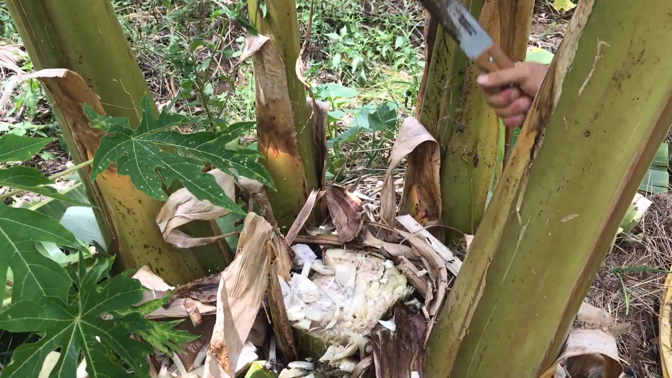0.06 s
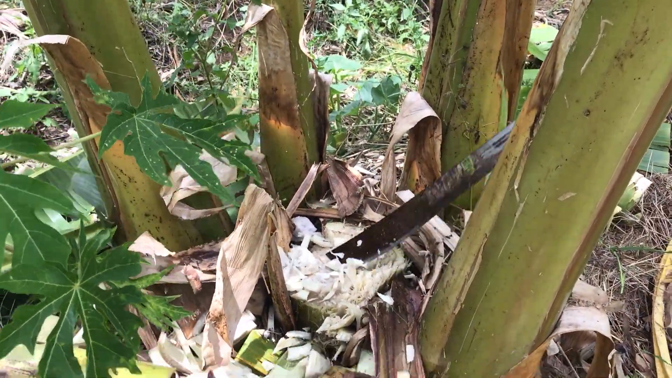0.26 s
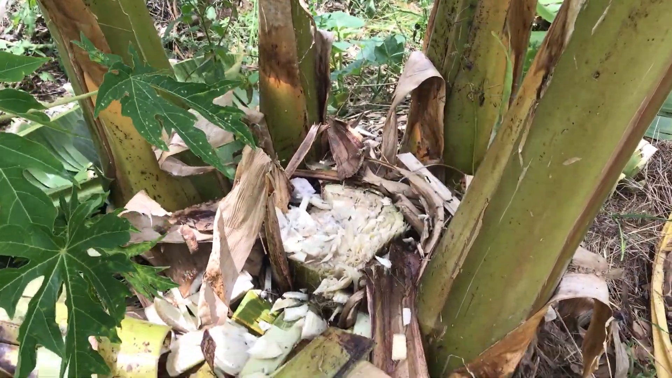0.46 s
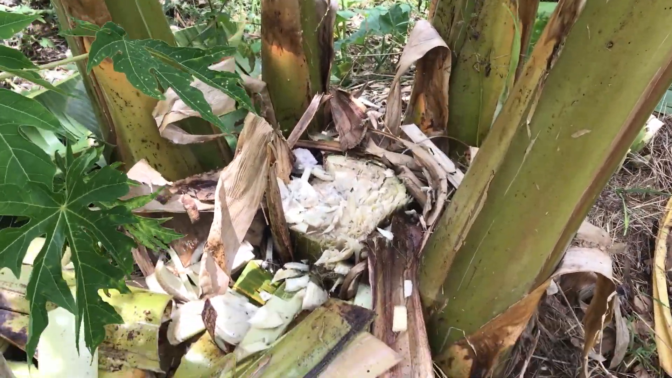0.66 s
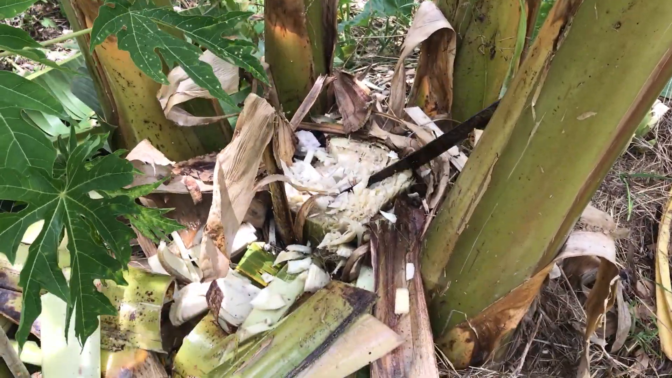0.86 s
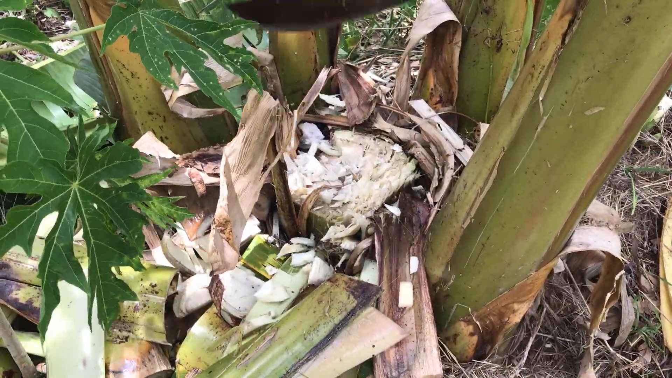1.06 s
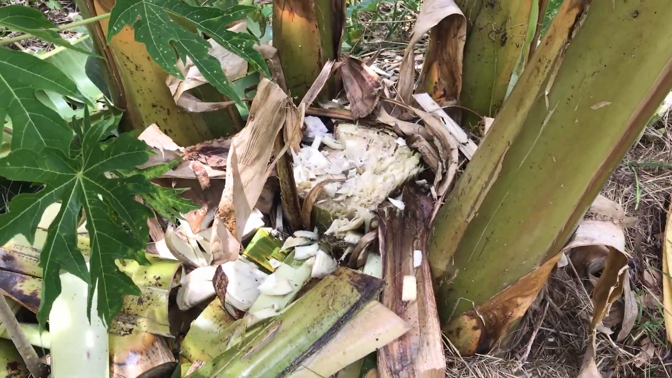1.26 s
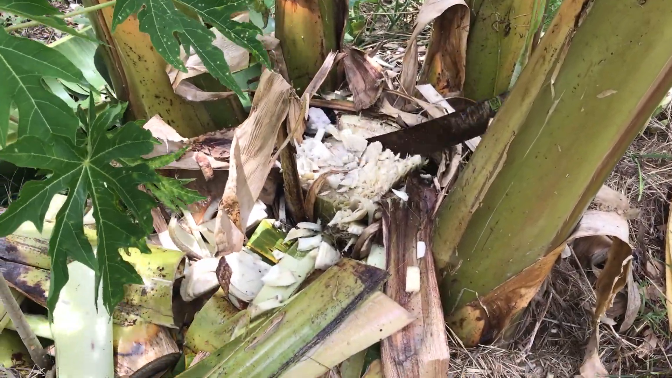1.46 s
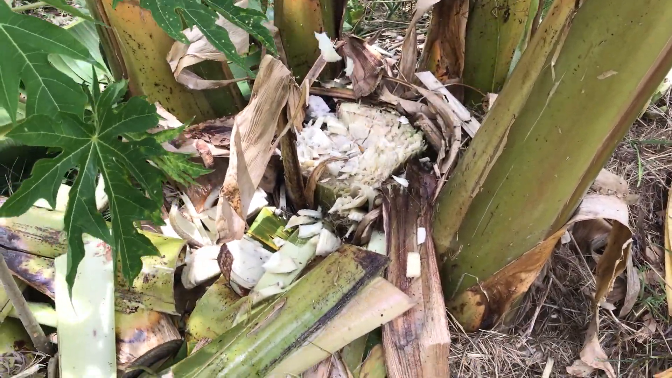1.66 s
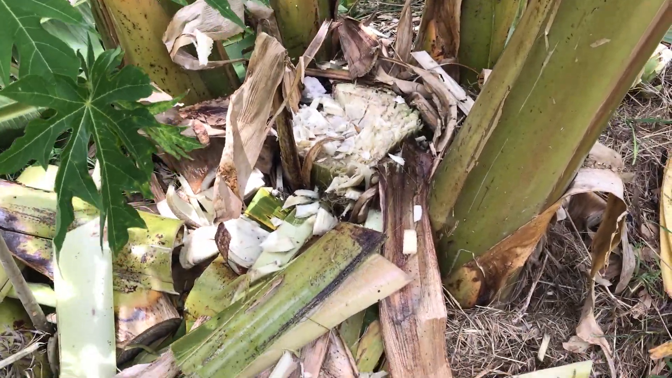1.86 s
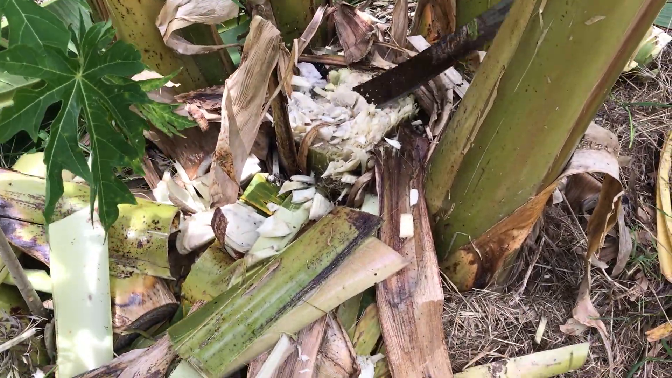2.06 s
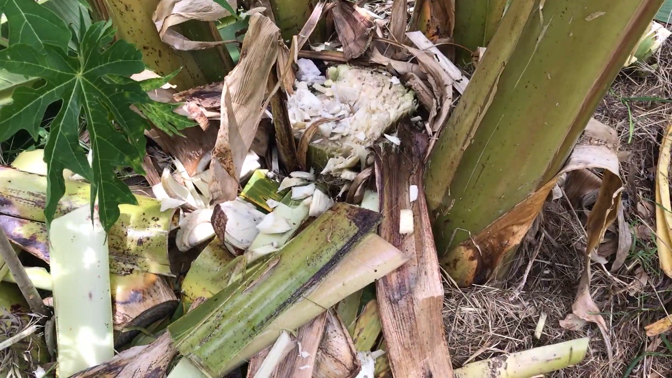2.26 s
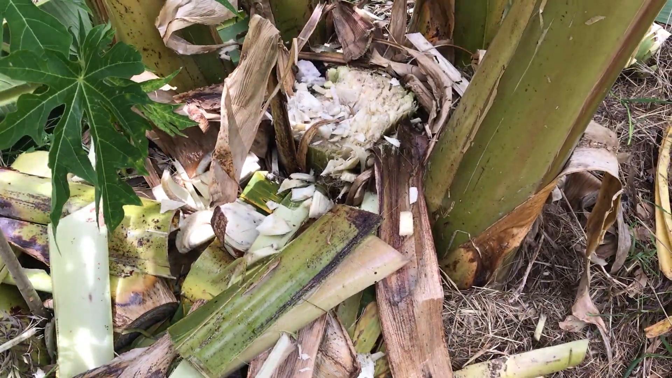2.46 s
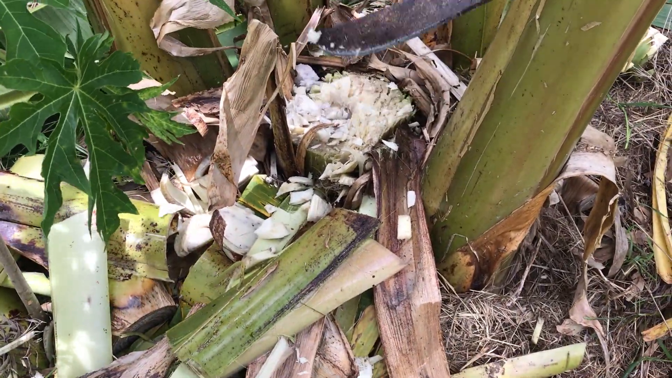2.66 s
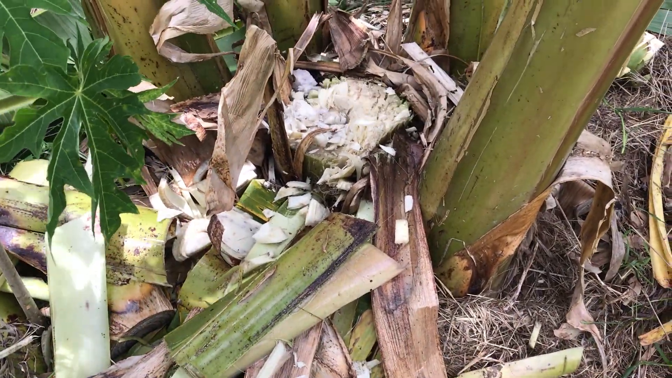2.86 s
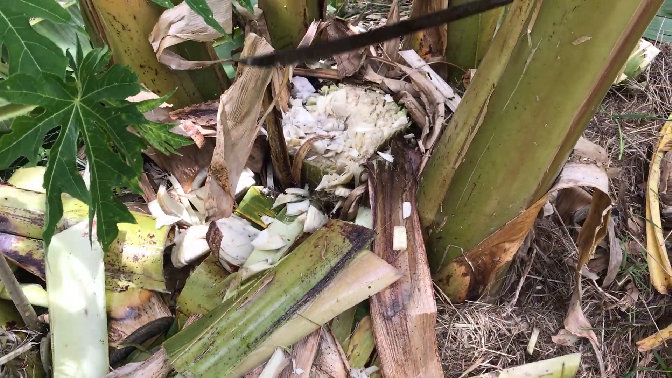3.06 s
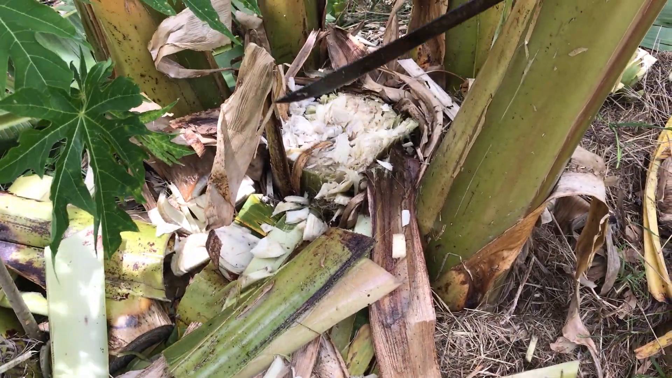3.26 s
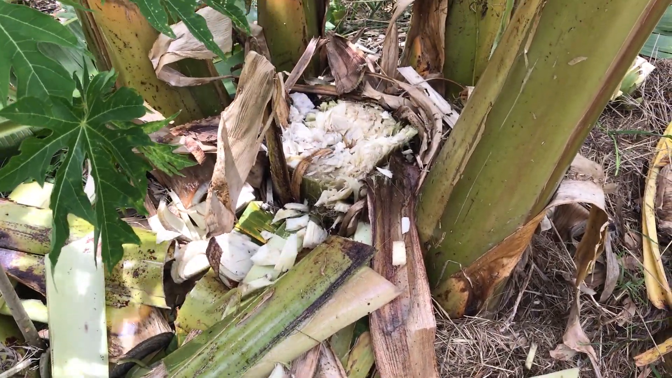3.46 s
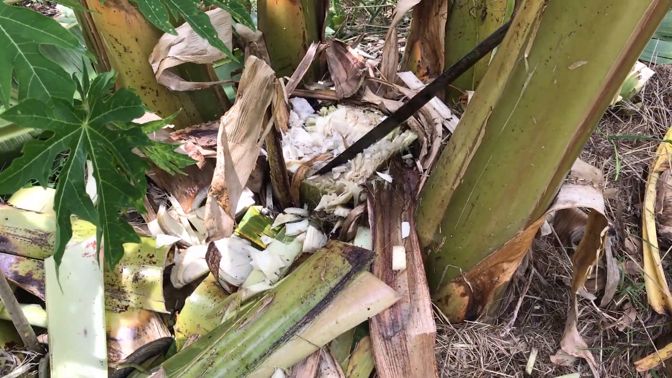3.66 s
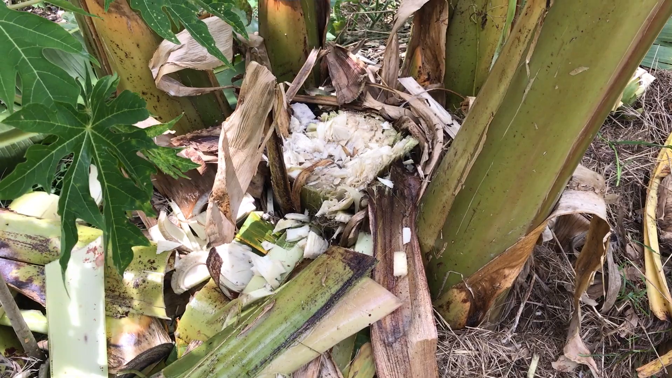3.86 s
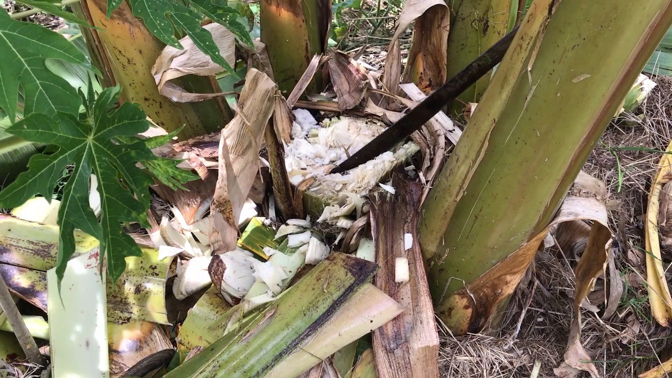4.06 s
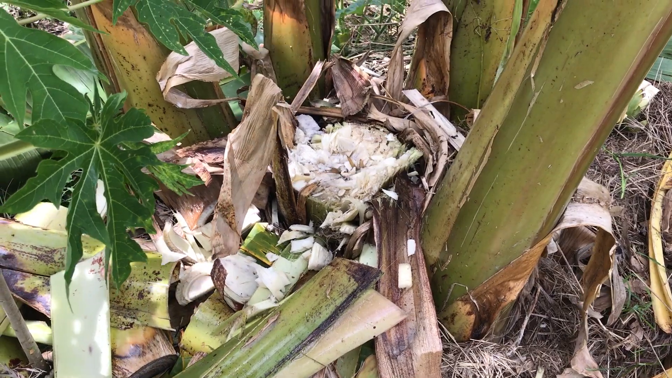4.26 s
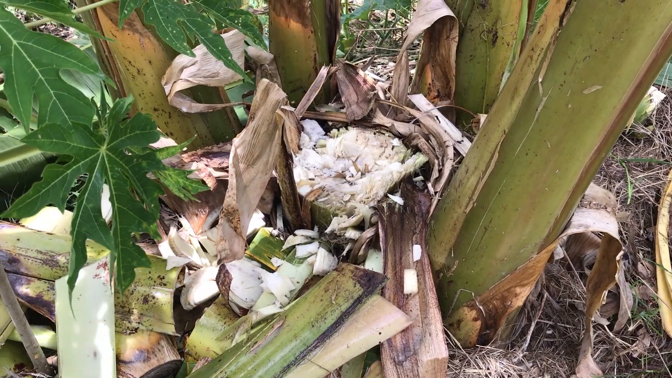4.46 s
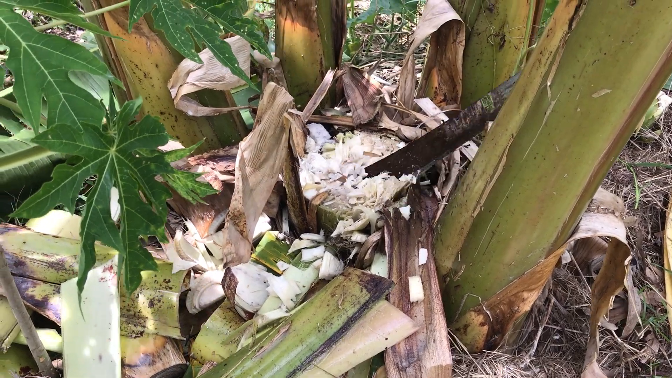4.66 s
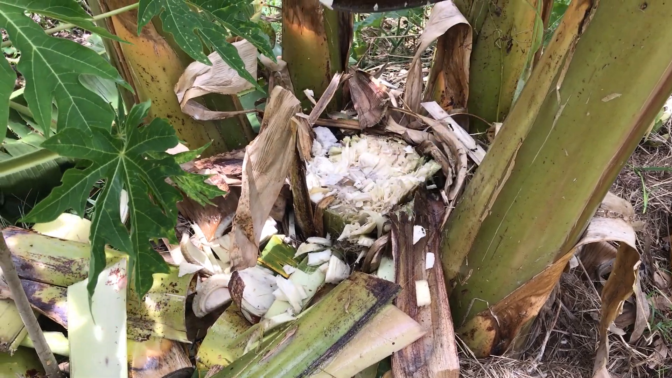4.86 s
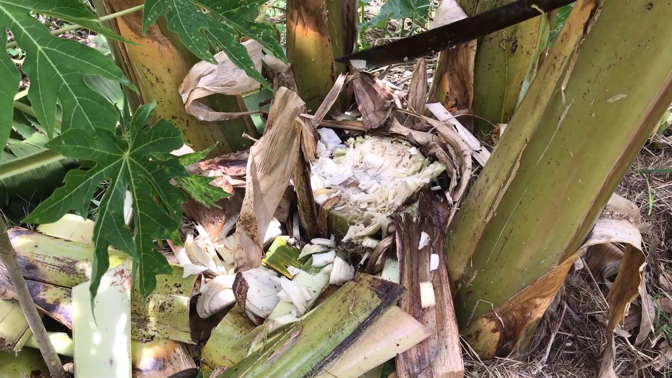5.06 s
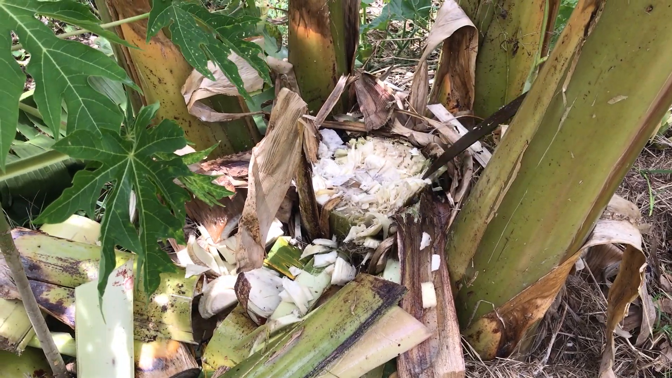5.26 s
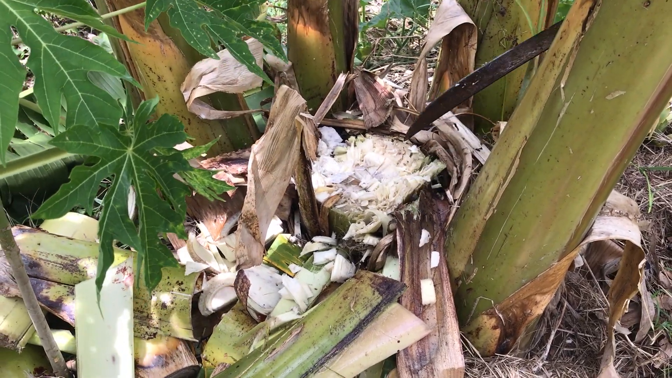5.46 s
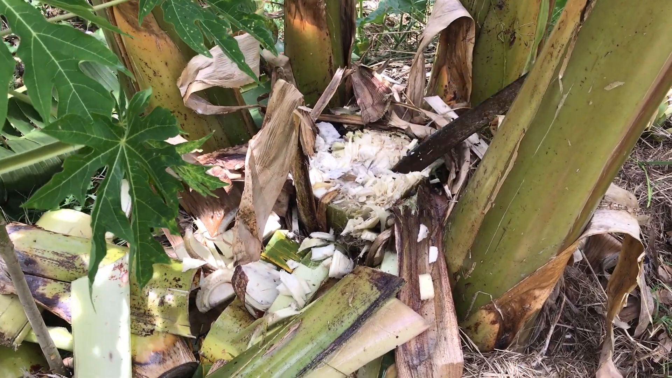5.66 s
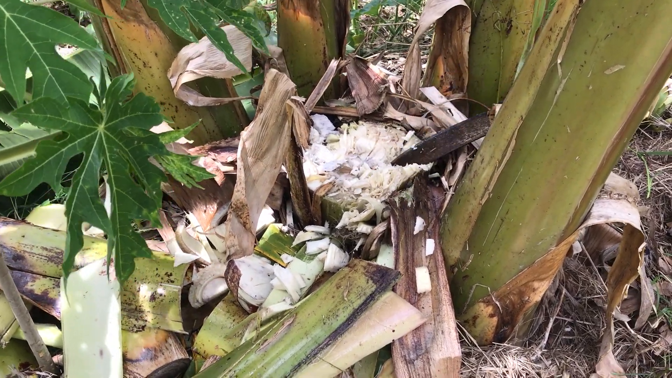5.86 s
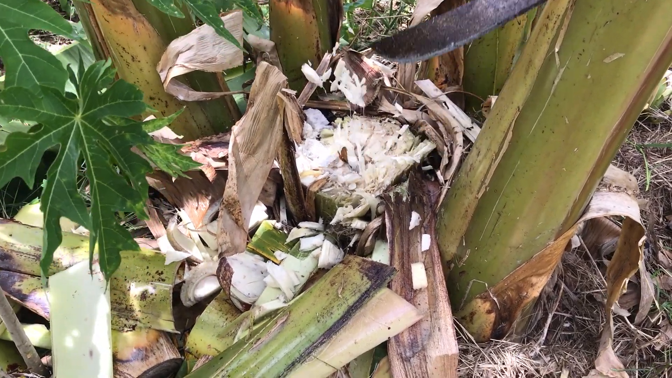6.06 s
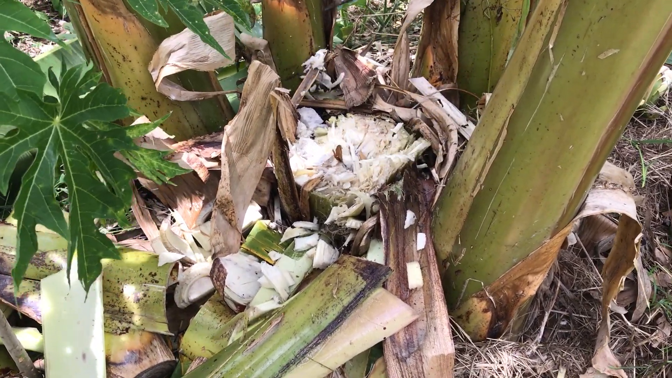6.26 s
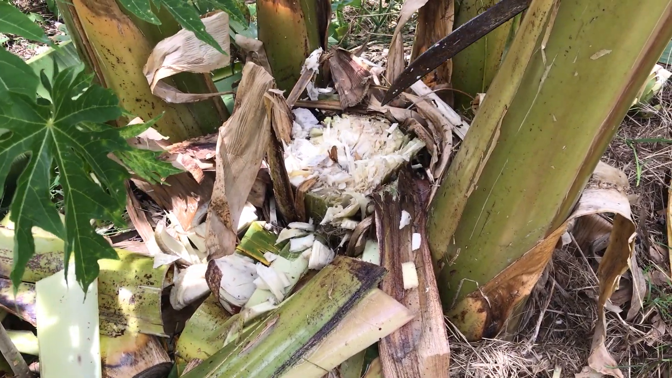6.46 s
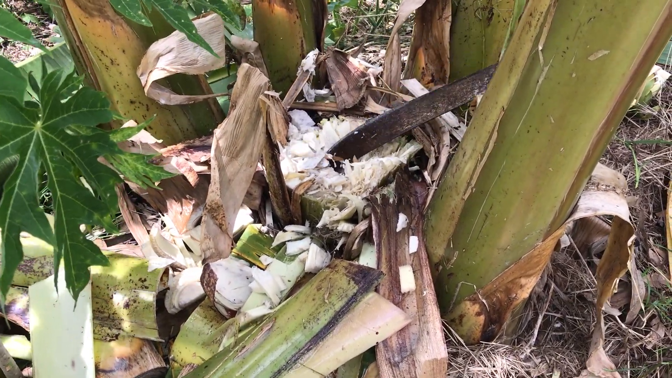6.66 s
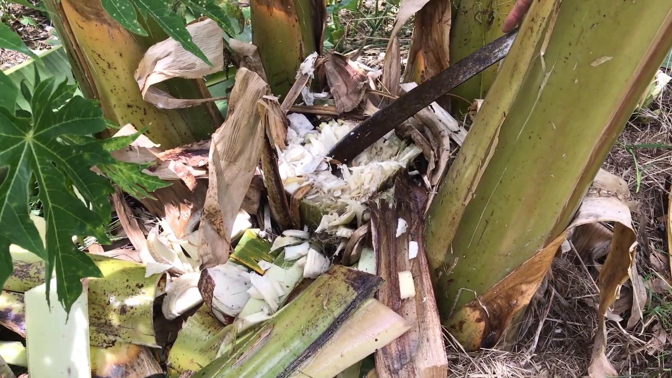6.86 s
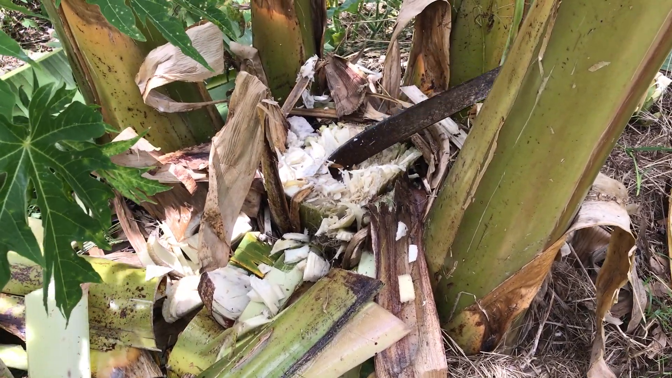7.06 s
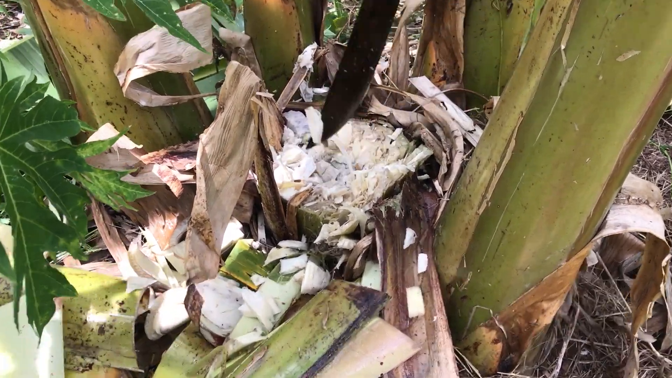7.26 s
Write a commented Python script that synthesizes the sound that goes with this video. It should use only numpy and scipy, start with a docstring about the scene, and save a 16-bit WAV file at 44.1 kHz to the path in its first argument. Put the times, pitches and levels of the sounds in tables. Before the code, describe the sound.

A long blade chops again and again into a wet, fibrous plant stump outdoors, with crunching snaps, dull knocks and light wind bumping the microphone.

```python
"""Outdoors, one microphone: light wind buffets its port over a far rustle of leaves, all shaped noise and swells.
From the first moments a long blade chops a wet, fibrous stump: dense snaps through resonances, with knocks
and low thuds from ringing modes. Lighter contacts drag, snap and settle; now and then the steel rings faintly.
Near the middle a distant engine, a tone with a weak partial, fades in; later a faint squeak falls in pitch,
the blade stirs and scrapes the pulp, the engine goes, and a few last chops follow."""
import sys
import numpy as np
from scipy import signal
from scipy.io import wavfile

SR = 44100
rng = np.random.default_rng(int(sys.argv[2]) if len(sys.argv) > 2 else 0)


def put_to_file(sound):
    """Save the sound as 16-bit audio at rate SR, in the file named by the first command-line argument."""
    columns = np.atleast_2d(sound).T  # one column per channel
    safe = np.clip(columns, -1, 1)
    whole_steps = np.round(safe * 32767)
    wavfile.write(sys.argv[1], SR, whole_steps.astype(np.int16))


N = 322371

# All levels are ahead of the microphone's own colour.
# Distant engine, heard from the first row to the last: [t/s, firing f/Hz, mean level/dB]
ENGINE = [(3.75, 53.7, -85), (3.85, 54, -55), (4.01, 63.2, -61), (4.63, 67.8, -58), (5.07, 64.5, -63),
          (5.21, 73.7, -65.5), (5.449, 74.5, -58), (5.75, 85, -62.5)]
# Spectrum of the far leaves: [f/Hz, relative level of the noise density/dB]
LEAF_SPECTRUM = [(88, -31), (150, -3), (488, -6), (898, -8.5), (1250, -7.5), (2010, -10.5), (4000, -12.5),
                 (6170, -15.5), (7660, -17.5), (8620, -17.5), (10300, -17.5), (12500, -21.5), (15600, -19),
                 (16500, -49.5)]
# Loudness of the far leaves: [t/s, level/dB]
LEAF_LEVEL = [(0, -57), (.4, -60), (.96, -58.5), (1.77, -59.5), (5.37, -62), (6.0, -58.5), (6.96, -61.5),
              (7.31, -58.5)]
# Wind at the microphone port: [t/s, rumble level/dB, flutter level/dB]
WIND = [(0.0, -41, -43), (0.14, -56, -67), (0.32, -52, -48), (0.63, -57, -63), (1.22, -60.5, -55.5),
        (1.4, -55, -52.5), (1.55, -56.5, -59), (1.73, -65, -72), (1.89, -65, -63), (2.46, -60, -65),
        (2.54, -61.5, -61.5), (2.87, -64.5, -66), (3.03, -57.5, -56), (3.24, -58, -60.5),
        (3.34, -58.5, -71), (3.68, -65.5, -63.5), (4.27, -60, -75), (4.48, -57, -75), (5.21, -60, -70),
        (5.39, -62.5, -70), (6.19, -60, -62.5), (6.33, -63.5, -63.5), (6.88, -63, -69.5),
        (7.31, -71, -67.5)]
# Gusts thump the microphone port: [t/s, peak level/dB, base pitch f/Hz, which the sweep multiplies]
BUFFETS = [(.03, -46, 153), (0.218, -33.5, 70), (0.28, -53, 69), (.329, -36, 53.8), (0.37, -37, 68),
           (0.416, -37, 55), (.455, -43.5, 70), (0.62, -46, 146), (0.681, -42.5, 78), (.859, -46, 179),
           (0.92, -32.5, 95), (1.158, -45.5, 143), (1.213, -37, 62), (1.27, -38, 74), (1.306, -37.5, 138),
           (1.507, -44, 129), (1.559, -49, 67), (1.649, -47, 76.5), (2.278, -44, 48.4), (2.798, -47, 135),
           (3.051, -44, 138), (3.377, -39.5, 61), (3.448, -46.5, 254), (4.447, -52, 70.6),
           (4.941, -45.5, 149.4), (5.821, -36, 64), (6.117, -48.5, 114), (6.334, -38.5, 147),
           (6.654, -42.5, 60.5), (6.854, -44.5, 59.2), (7.084, -46.5, 49)]
# Wet steel on a sheath: [t/s, length/s, from f/Hz, to f/Hz, peak level/dB]
SQUEAK = (5.315, .035, 2680, 2420, -62)
# Steel modes of the blade: [f/Hz, relative level/dB, t60/s]
BLADE_MODES = [(4371, 0, .4), (5033, -6, .45), (5647, -8, .33), (6170, -3, .28), (6681, -6, .2),
               (7978, -14, .15), (11440, -12, .17), (12440, -10, .15), (13420, -12, .2), (14365, -10, .15),
               (15220, -12, .3)]
# The steel is set ringing: [t/s, rub length/s, drive level/dB, favoured f/Hz, spread f/Hz]
RUBS = [(.19, .095, -49.5, 5650, 300), (2.112, .01, -49, 6680, 300), (5.286, 0.059, -59, 6170, 300),
        (5.385, .03, -39, 14200, 1300), (5.41, 0.018, -47.5, 5770, 300), (5.44, .17, -45, 15200, 500),
        (5.995, .01, -38, 12840, 2000), (5.994, 0.034, -43, 4800, 750), (6.003, .01, -42, 6350, 520),
        (6.41, 0.15, -41.5, 15200, 590), (6.501, .09, -54, 6170, 297)]
# Single fibres and bits of leaf snap: [t/s, peak level/dB, centre f/Hz, width as share of centre]
SNAPS = [(.732, -46, 10000, 1), (0.966, -35, 6200, 0.16), (.9856, -38, 11400, 0.8),
         (1.207, -47.5, 4040, 0.66), (1.496, -42, 1320, 0.61), (1.9526, -33.5, 1860, 0.59),
         (2.052, -32.5, 2390, .6), (2.103, -33.5, 9250, .92), (2.311, -40, 1040, 1.2),
         (2.474, -45, 1100, .5), (3.158, -45, 2810, 1), (3.191, -39, 2000, 0.98), (3.28, -48, 1000, .8),
         (3.4562, -39.5, 705, 0.87), (4.0906, -46, 8660, 1.3), (4.274, -48, 1600, 0.52),
         (5.094, -48.5, 3080, 1.2), (5.533, -40.5, 1335, 0.73), (5.602, -42, 4480, .6),
         (5.7901, -42, 1168, 0.2), (5.807, -47, 1200, 0.46), (5.967, -38, 2800, .5),
         (6.1394, -48.5, 785, 0.66), (6.1567, -44.5, 10000, 1.16), (6.204, -44, 1700, 0.51),
         (6.227, -43, 2000, .6), (6.25, -36, 1500, 0.71), (6.282, -39.5, 1080, 0.44),
         (6.582, -37, 2600, 0.16), (6.628, -24.5, 4140, 0.21), (6.644, -26, 4200, 0.28),
         (6.8352, -40, 8396, 0.36), (6.899, -48.5, 3000, 1.4), (7.219, -39, 1050, 0.59),
         (7.227, -41, 1100, .5)]
# Modes of the upper stump: [f/Hz, level over the thud/dB, t60/s]
FLEX_MODES = [(168, 8.5, 0.0479), (240, 14, 0.036), (275, 8, .035), (460, 6, .03)]
# Modes of the cut face: [f/Hz, relative level/dB, t60/s]
GASH_MODES = [(635, -6, .02), (860, -11.5, .014), (1116, -5.5, 0.011), (1500, -10.5, 0.019),
              (1852, -7.5, 0.023), (2100, -4, .017)]
# Resonances of the wet stump: [f/Hz, width f/Hz, relative level/dB]
PULP = [(306, 200, -7), (597.8, 83, 0.5), (1040, 540, -1.5)]
# Resonances of stiff fibres: [f/Hz, width f/Hz, relative level/dB]
CRUNCH = [(1949, 1700, 3), (3500, 3700, 2)]
# Resonances of thin fibres and sap: [f/Hz, width f/Hz, relative level/dB]
SIZZLE = [(6360, 1400, 1), (8670, 2300, -1.5), (13800, 9200, -1.5)]
# Lighter contacts: the blade drags through pulp and leaves, fibres snap, and torn layers settle after a chop:
# [t/s, rise/s, crunch level/dB, pulp over crunch/dB, sizzle over crunch/dB, t60/s]
LIGHT_CONTACTS = [(.196, .004, -52, -10, .5, .29), (.893, 0.068, -54, -23, 6, .04),
                  (1.508, 0.0056, -59.5, -8, 3.5, 0.33), (1.978, .0017, -56, 6, 0.5, 0.085),
                  (1.992, 0.0088, -41, -12, -17, .025), (2.008, 0.00084, -38, -3, -24, .015),
                  (2.082, 0.011, -50.5, -3, 3, 0.18), (2.414, .0024, -50, 0.5, -4, 0.089),
                  (2.45, 0.00077, -46, -11, 10, 0.083), (2.484, .001, -49, -14, 2, 0.039),
                  (2.536, 0.0019, -44, 7, -19, .036), (2.575, 0.019, -56.5, -3, -2, .16),
                  (3.148, .006, -56, -9, -7, .29), (3.467, 0.015, -59, -5, 3.5, 0.097),
                  (3.932, 0.0026, -48, -12, 0, 0.061), (4.036, 0.041, -58, -14, 3, 0.092),
                  (4.528, 0.016, -64.5, 0.5, 4, .06), (4.562, .0008, -55, -9.5, 6, 0.011),
                  (5.367, .012, -69, -3, 7, 0.35), (5.612, 0.032, -40, -9, 1, 0.1),
                  (5.689, 0.0046, -52.5, -24, -3, 0.11), (5.762, .024, -53.5, -5, 3, 0.089),
                  (5.825, 0.0076, -59.5, -10, -5, 0.67), (5.908, .001, -58.5, -13, 2, 0.22),
                  (5.916, 0.051, -46.5, -10.5, -6.5, 0.1), (5.979, 0.014, -50.5, -2, 13.5, 0.054),
                  (6.11, 0.021, -61, -18, -15, 0.32), (6.182, 0.022, -55, -4, -3, 0.2),
                  (6.22, 0.024, -47.5, -4.5, -3.5, 0.16), (6.269, 0.0091, -58, -4, -3, 0.19),
                  (6.321, 0.0056, -57.5, -8, -4, 0.35), (6.797, .015, -63, -4, 1.5, 0.43),
                  (7.184, 0.04, -56, 1, 8, .1)]
# The edge tears through a layer: [t/s, rise/s, hold/s, crunch level/dB, pulp over crunch/dB, sizzle over crunch/dB,
# settling over chop/dB, thud drive/dB, contact/s (1 ms at least), knock drive/dB, knock centre f/Hz]
CHOPS = [(.150, 0.00059, 0.0028, -30, 3, -4, -30, -74, .003, -40, 1100),
         (.153, 0.0048, 0.0035, -18, -2.5, -6.5, -21, -37, 0.00091, -12, 1300),
         (.803, 0.0012, 0.007, -21.5, -16, -5.5, -19, -56, 0.0033, -32, 2000),
         (0.809, .0036, 0.0029, -23, -12, 9, -26.5, -51.5, 0.0023, -25, 1500),
         (.82, 0.0052, 0.0049, -21.5, -3.5, -2, -21, -43.5, 0.0012, -2.5, 1080),
         (1.049, .0062, .0054, -39.5, -5.5, 0.5, -14.5, -71, .004, -19, 2030),
         (1.448, 0.0048, 0.0018, -16.5, -6.5, -2.5, -19.5, -45.5, 0.0022, -19, 2100),
         (2.016, 0.00045, 0.0046, -19.5, -10, -1.5, -20, -36, 0.0085, -20, 2100),
         (2.5131, 0.0014, 0.0045, -24.5, -4, -0.5, -14, -43, 0.0049, -26, 1110),
         (3.107, 0.0077, 0.0064, -21, -5.5, 2.5, -19, -45, 0.0047, -21, 700),
         (3.5739, 0.0009, 0.0065, -26.5, -5, 1.5, -18, -45, 0.0019, -11, 1120),
         (3.942, 0.0022, .013, -39.5, -3, 3.5, -11.5, -56.5, 0.0028, -38, 1100),
         (3.965, 0.0016, 0.0055, -25.5, -3.5, 1, -20, -48, 0.0036, -7.5, 950),
         (4.572, .0008, 0.0015, -32.5, -9, -7.5, -22, -74, .0044, -17.5, 1670),
         (4.586, 0.0021, 0.0028, -26.5, -1.5, -2, -28, -62, 0.0033, -22, 1100),
         (4.5919, 0.0022, 0.0039, -22.5, -8, -4, -11.5, -32.5, 0.0075, -6.5, 1120),
         (5.65, 0.019, .012, -42, 1.5, -7, -15, -57.5, 0.0038, -19.5, 1505),
         (6.571, .01, .01, -47, -5, 6.5, -7, -59, .002, -47, 2000),
         (6.599, .02, 0.012, -46, 0, 4.5, -21, -60, 0.0025, -13, 840),
         (6.634, 0.0032, 0.0083, -43, -2.5, -0.5, -9.5, -56, 0.0032, -26.5, 616),
         (7.16, 0.00299, .008, -36.5, -6.5, -6, -4, -55, 0.0064, -8.5, 1470)]

BUFFET_T60_S, BUFFET_SAG = 0.075, 1   # the sag is a share of the base pitch
STUMP_HZ, STUMP_T60_S = 89.7, 0.16
SNAP_T60_S, CHOP_T60_S, SETTLING_T60_S = 0.037, 0.028, 0.19
# Knocks: distance from the centre where the drive is down to 1/e, share of the hold they fall in, spread of strength
KNOCK_SPREAD_OCT, KNOCK_LAG_SHARE, STRIKE_SCATTER_DB = 0.4, 0.9, 2.5
RISE_DB = 28   # a contact swells by this much
SNAPS_PER_S, GRAIN_DB = 14000, 4   # mean rate of the dense shower, scale of a snap's random boost
CRACKLES_PER_S, CRACKLE_DB = 310, -8.5   # mean rate, level against the crunch effort
PULP_LAG_S = 0.0025
LIGHT_HOLD_S, LIGHT_HOLD_SHARE = 0.0017, 0.32   # a lighter contact holds this long plus a share of its rise
MIC_LOW_HZ, MIC_EDGE_HZ, MIC_STOP_HZ = 36, 15750, 16900   # low cut, top passband edge, full rejection
MIC_DIP_HZ, MIC_DIP_WIDTH_HZ, MIC_DIP_SHARE = 10460, 1100, 0.46


def from_db(db):
    """Gain of a level in dB."""
    return 10 ** (np.asarray(db) / 20)


def rms_one(x):
    """Scale to rms 1."""
    return x / np.sqrt(np.mean(x ** 2) + 1e-20)


def in_time(rows):
    """Columns of a curve table at every sample."""
    s, *columns = np.transpose(rows)
    return [np.interp(np.arange(N) / SR, s, column) for column in columns]


def drift(corner_hz):
    """Slow chance of rms 1: noise at every 40th sample through a double one-pole low-pass."""
    r = np.exp(-80 * np.pi * corner_hz / SR)
    coarse = rng.standard_normal(N // 40 + 2002)
    slow = signal.lfilter([1], [1, -2 * r, r * r], coarse)[2000:]   # the start-up is left out
    return np.interp(np.arange(N) / 40, np.arange(len(slow)), rms_one(slow))


def band(x, low_hz, high_hz):
    """Band-pass."""
    return signal.sosfilt(signal.butter(2, [low_hz, high_hz], "band", fs=SR, output="sos"), x)


def resonate(x, hz, width_hz):
    """One resonance, gain 1 on top."""
    r = np.exp(-np.pi * width_hz / SR)
    poles = [1, -2 * r * np.cos(2 * np.pi * hz / SR), r * r]
    return signal.lfilter([(1 - r * r) / 2, 0, (r * r - 1) / 2], poles, x)


def ring(force, hz, t60):
    """A damped mode: a unit click sets a sine of starting height 1 ringing."""
    r, w = from_db(-60 / (t60 * SR)), 2 * np.pi * hz / SR
    return signal.lfilter([0, np.sin(w)], [1, -2 * r * np.cos(w), r * r], force + 1e-18)


def stroke(s, rise, hold, t60):
    """First sample and gain of a contact that swells, holds and dies, straight in dB."""
    t = np.arange(int((rise + hold + t60) * SR)) / SR
    start = round(s * SR)
    swell_db = np.minimum(RISE_DB * (t / rise - 1), 0)
    decay_db = 60 * np.maximum(t - rise - hold, 0) / t60
    return start, from_db(swell_db - decay_db)[:N - start]


def add(track, start, x):
    """Mix x into track."""
    track[start:start + len(x)] += x[:N - start]


def uneven_clicks(per_s, boost_db):
    """Random clicks of either sign, with exponentially spread boosts in dB."""
    sizes = from_db(boost_db * np.minimum(rng.exponential(1, N), 4)) * rng.choice([-1, 1], N)
    return sizes * (rng.random(N) < per_s / SR)


def engine():
    """A distant motor: the firing tone and a weak third partial, wavering and fading in and out."""
    hz, level_db = in_time(ENGINE)
    t = np.arange(N) / SR
    fade = np.clip(np.minimum(t - ENGINE[0][0], ENGINE[-1][0] - t) / 0.11, 0, 1)
    turn = 2 * np.pi * np.cumsum(hz) / SR
    tone = np.sin(turn) + from_db(-26.0) * np.sin(3 * turn)
    return np.sqrt(2) * fade * from_db(level_db + 1.8 * drift(2.9)) * tone


def leaves():
    """Far rustle: third-octave noise bands that flicker, partly together."""
    out, together = 0, drift(3)
    edges = 150 * 2 ** np.arange(0, 7.1, 1 / 3)
    white, table = rng.standard_normal((2, N)), np.array(LEAF_SPECTRUM)
    for k, (low, high) in enumerate(zip(edges, edges[1:])):
        level_db = np.interp(np.log(low * high) / 2, np.log(table[:, 0]), table[:, 1])
        flicker_db = 0.6 * together + 0.8 * drift(10)
        # Neighbouring bands take different noise.
        out = out + from_db(level_db + flicker_db) * band(white[k % 2], low, high)
    return from_db(in_time(LEAF_LEVEL)[0]) * rms_one(out)


def wind():
    """Low noise on the microphone port; the flutter comes in short spurts that reach higher."""
    rumble_db, flutter_db = in_time(WIND)
    rumble = rms_one(band(band(rng.standard_normal(N), 23, 71), 25, 120))
    spurts = np.tanh(drift(20))
    low = band(rng.standard_normal(N), 95, 190)
    high = band(rng.standard_normal(N), 190, 330)
    flutter = rms_one(from_db(14.0 * spurts) * low + from_db(7 * spurts - 9.5) * high)
    return from_db(rumble_db) * rumble + from_db(flutter_db) * flutter


def buffets():
    """An eddy passing the microphone port: a swell whose pitch sags as it slows."""
    out = np.zeros(N)
    for s, peak_db, base_hz in BUFFETS:
        start, gain = stroke(s, 0.0078, 0.0063, BUFFET_T60_S)
        t = np.arange(len(gain)) / SR
        hz = base_hz * (0.659 + BUFFET_SAG * np.exp(-t / 0.011))
        turn = 2 * np.pi * np.cumsum(hz) / SR
        add(out, start, from_db(peak_db) * gain * np.sin(turn + rng.uniform(0, 2 * np.pi)))
    return out


def squeak():
    """Wet steel on a sheath: a faint chirp that falls evenly in pitch."""
    s, length, from_hz, to_hz, level_db = SQUEAK
    count, out = int(length * SR), np.zeros(N)
    turn = 2 * np.pi * np.cumsum(np.linspace(from_hz, to_hz, count)) / SR
    add(out, round(s * SR), from_db(level_db) * np.hanning(count) * np.sin(turn))
    return out


def blade():
    """A short rub excites the steel modes near its favoured pitch."""
    out = np.zeros(N)
    for hz, mode_db, t60 in BLADE_MODES:
        force = np.zeros(N)
        for s, rub, level_db, favoured_hz, spread_hz in RUBS:
            window = np.hanning(int(rub * SR))
            turn = 2 * np.pi * hz * np.arange(len(window)) / SR
            push = window / window.sum() * np.sin(turn + rng.uniform(0, 2 * np.pi))
            near = np.exp(-((hz - favoured_hz) / spread_hz) ** 2)
            add(force, round(s * SR), 2 * from_db(level_db + mode_db) * near * push)
        out += ring(force, hz, t60)
    return out


def snaps():
    """Single fibres and bits of leaf: short noise bursts that die fast around their own pitch."""
    out, bursts = np.zeros(N), rng.standard_normal((len(SNAPS), 3000))
    for (s, peak_db, hz, share), burst in zip(SNAPS, bursts):
        start, gain = stroke(s - 0.001, 0.0005, 0.0015, SNAP_T60_S)
        width_hz = share * hz
        coloured = resonate(resonate(burst, hz, width_hz), hz, 2 * width_hz)
        sound = coloured[-len(gain):] * gain
        add(out, start, from_db(peak_db) * sound / np.abs(sound).max())
    return out


def thuds():
    """The rooted stump takes a soft push as the edge comes to rest; a short contact also flexes its upper part."""
    force = np.zeros(N)
    for s, rise, hold, *rest, thud_db, contact, knock_db, knock_hz in CHOPS:
        window = np.hanning(int(max(contact, 0.001) * SR))
        add(force, round((s + rise + hold) * SR), from_db(thud_db) * 2 * window / window.sum())
    flex = sum(from_db(db) * resonate(ring(force, hz, t60), hz, 1.8 * hz) for hz, db, t60 in FLEX_MODES)
    return resonate(ring(force, STUMP_HZ, STUMP_T60_S), STUMP_HZ, 110.0) + flex


def knocks():
    """Each chop pushes the gash three times while the edge holds, ringing the modes near its own centre."""
    out = np.zeros(N)
    scatter = rng.standard_normal((len(CHOPS), len(GASH_MODES), 3))
    # One push at a random place in each third of the knocking time, alike for all modes.
    moments = KNOCK_LAG_SHARE * (np.arange(3) + rng.random((len(CHOPS), 3))) / 3
    for k, (hz, mode_db, t60) in enumerate(GASH_MODES):
        force = np.zeros(N)
        window = np.hanning(int(0.8 * SR / hz) + 3)
        for chop, lucks, shares in zip(CHOPS, scatter[:, k], moments):
            s, rise, hold, *rest, knock_db, knock_hz = chop
            near = np.exp(-(np.log2(hz / knock_hz) / KNOCK_SPREAD_OCT) ** 2)
            for luck, share in zip(lucks, shares):
                strength = near * from_db(knock_db + mode_db + STRIKE_SCATTER_DB * luck)
                add(force, round((s + rise + share * hold) * SR), strength * window / window.sum())
        out += resonate(ring(force, hz, t60), hz, 1.5 * hz)
    return out


def crackle():
    """Lone thicker fibres part now and then, each ringing briefly at one of twelve pitches; rms 1."""
    clicks = uneven_clicks(CRACKLES_PER_S, 4.1)
    dealt = rng.integers(0, 12, N)
    pitches_hz = np.geomspace(750, 5000, 12)
    return rms_one(sum(resonate(ring(clicks * (dealt == k), hz, 3.9 / hz), hz, hz)
                       for k, hz in enumerate(pitches_hz)))


def fibres(peaks):
    """Dense uneven snaps heard through a set of resonances of alternating sign; rms 1."""
    grains = uneven_clicks(SNAPS_PER_S, GRAIN_DB)
    out = np.zeros(N)
    for k, (hz, width_hz, db) in enumerate(peaks):
        out += (-1) ** k * from_db(db) * resonate(resonate(grains, hz, 2 * width_hz), hz, width_hz)
    return rms_one(out)


def tearing():
    """Chops and lighter contacts share the fibre sounds; the wet pulp answers a little late."""
    pulp, crunch, sizzle = effort = np.zeros((3, N))
    lag = round(PULP_LAG_S * SR)
    contacts = [(s, rise, LIGHT_HOLD_S + LIGHT_HOLD_SHARE * rise, level_db, pulp_db, sizzle_db, t60)
                for s, rise, level_db, pulp_db, sizzle_db, t60 in LIGHT_CONTACTS]
    for s, rise, hold, level_db, pulp_db, sizzle_db, settling_db, *rest in CHOPS:
        contacts.append((s, rise, hold, level_db, pulp_db, sizzle_db, CHOP_T60_S))
        # Torn layers go on settling after a chop.
        contacts.append((s, rise, hold, level_db + settling_db, pulp_db, sizzle_db, SETTLING_T60_S))
    for s, rise, hold, level_db, pulp_db, sizzle_db, t60 in contacts:
        start, gain = stroke(s, rise, hold, t60)
        add(pulp, start + lag, from_db(level_db + pulp_db) * gain)
        add(crunch, start, from_db(level_db) * gain)
        add(sizzle, start, from_db(level_db + sizzle_db) * gain)
    shower = np.zeros(N)
    for push, peaks in zip(effort, (PULP, CRUNCH, SIZZLE)):
        uneven = from_db(2.3 * drift(150))   # the edge catches and slips
        shower += push * uneven * fibres(peaks)
    return shower + from_db(CRACKLE_DB) * crunch * crackle()


def scene():
    """Everything at one microphone."""
    air = engine() + leaves() + wind() + buffets()
    stump = squeak() + blade() + snaps() + thuds() + knocks() + tearing()
    return (air + stump)[None]


def record(dry):
    """The microphone cuts the deep bass, dips a little near 10 kHz and loses the top in two steps."""
    dipped = dry - MIC_DIP_SHARE * resonate(dry, MIC_DIP_HZ, MIC_DIP_WIDTH_HZ)
    trimmed = signal.sosfilt(signal.butter(3, MIC_LOW_HZ, "high", fs=SR, output="sos"), dipped)
    edged = signal.sosfilt(signal.ellip(8, 0.5, 30, MIC_EDGE_HZ, fs=SR, output="sos"), trimmed)
    return signal.sosfilt(signal.cheby2(14, 60, MIC_STOP_HZ, fs=SR, output="sos"), edged)


dry = scene()
out = record(dry)
put_to_file(out)
```